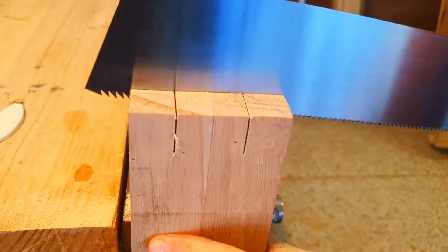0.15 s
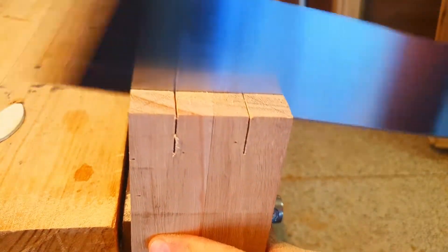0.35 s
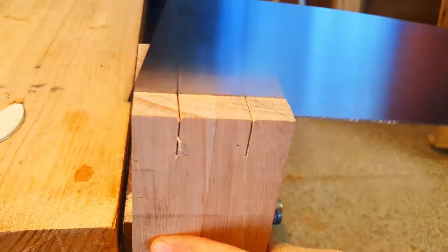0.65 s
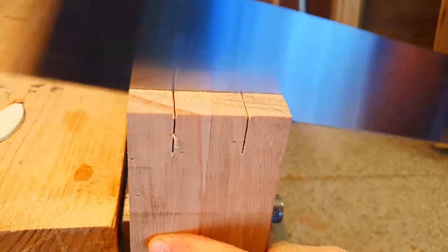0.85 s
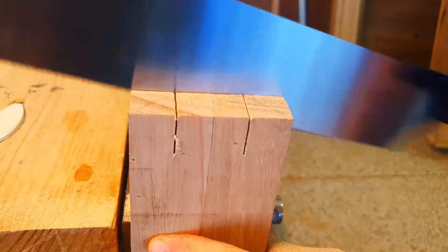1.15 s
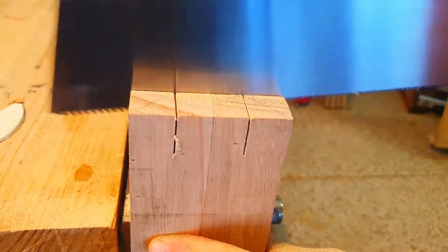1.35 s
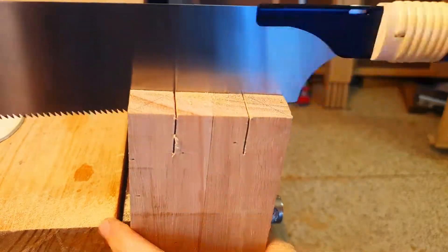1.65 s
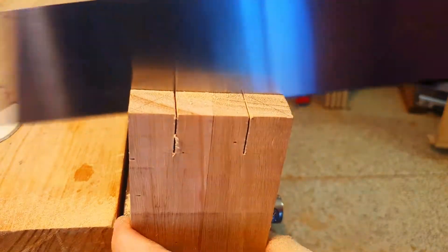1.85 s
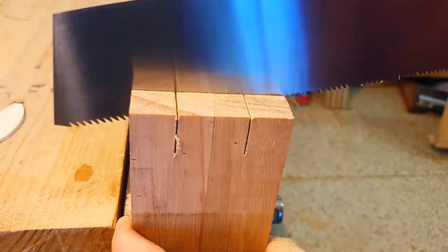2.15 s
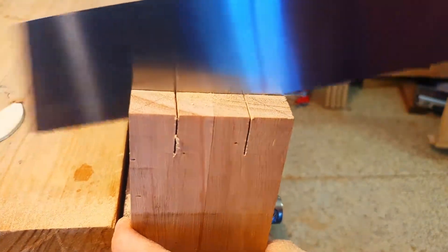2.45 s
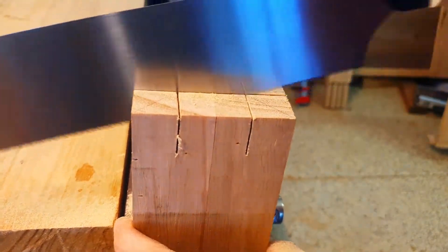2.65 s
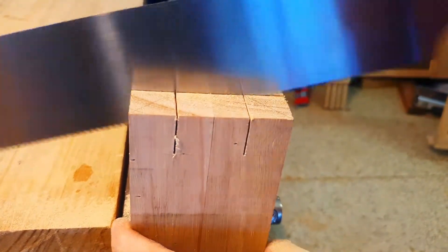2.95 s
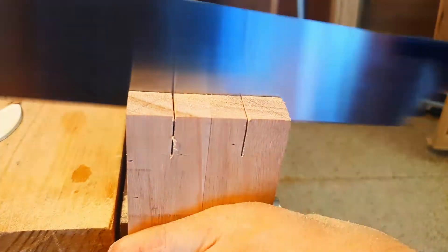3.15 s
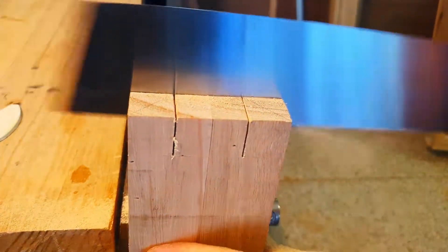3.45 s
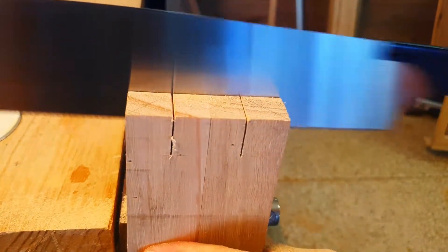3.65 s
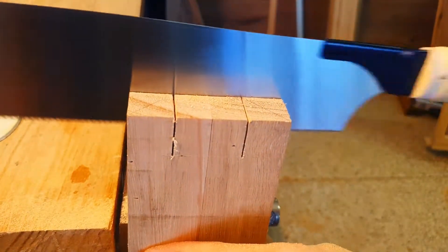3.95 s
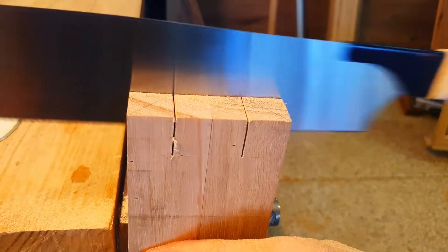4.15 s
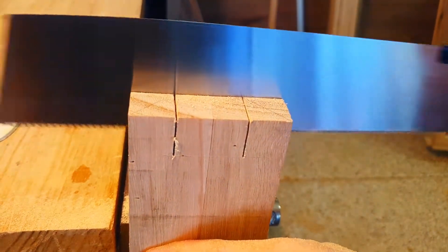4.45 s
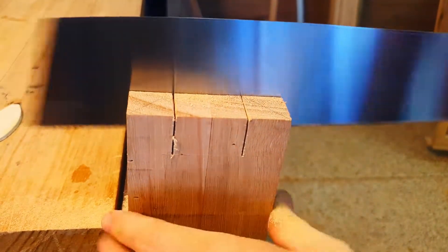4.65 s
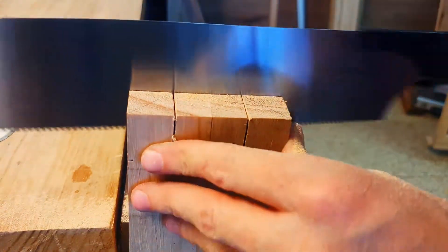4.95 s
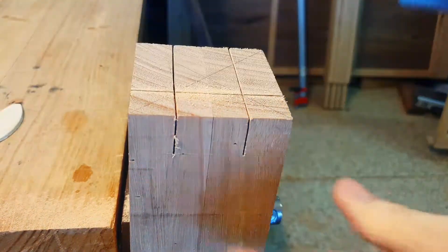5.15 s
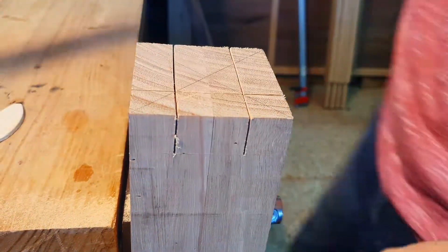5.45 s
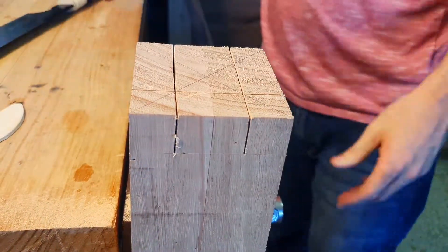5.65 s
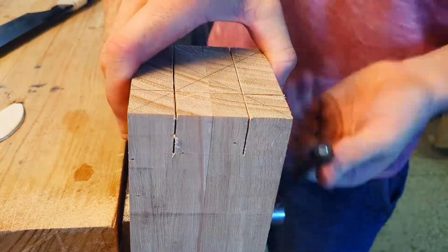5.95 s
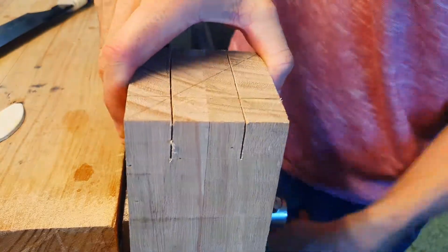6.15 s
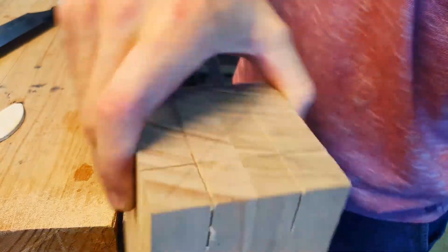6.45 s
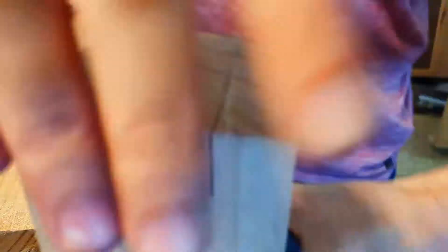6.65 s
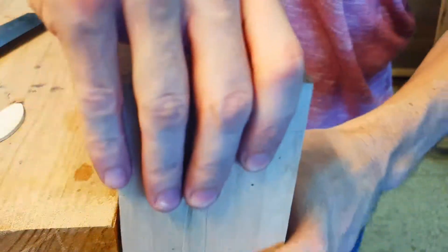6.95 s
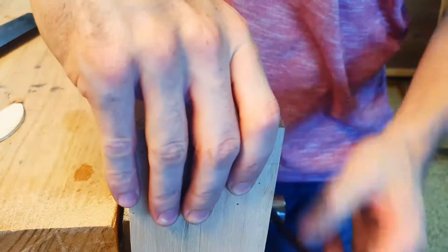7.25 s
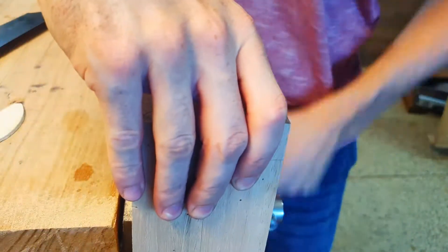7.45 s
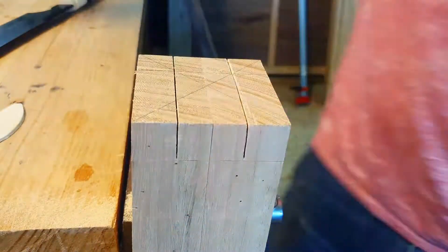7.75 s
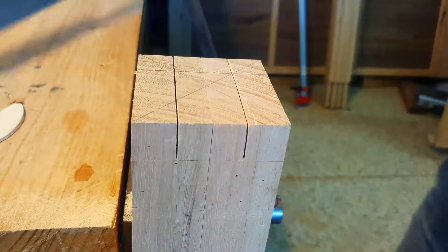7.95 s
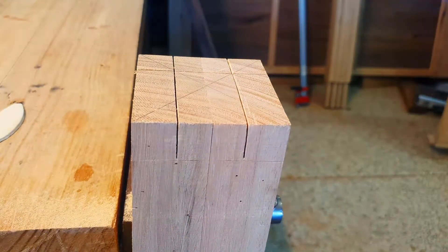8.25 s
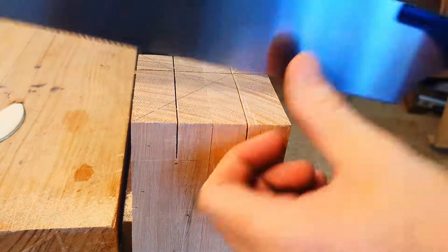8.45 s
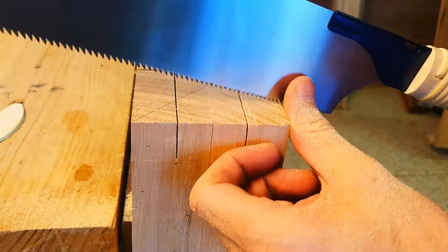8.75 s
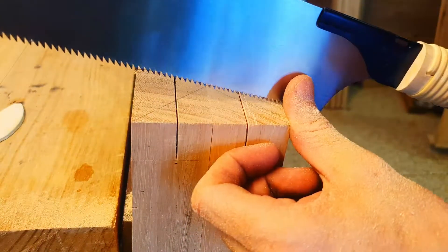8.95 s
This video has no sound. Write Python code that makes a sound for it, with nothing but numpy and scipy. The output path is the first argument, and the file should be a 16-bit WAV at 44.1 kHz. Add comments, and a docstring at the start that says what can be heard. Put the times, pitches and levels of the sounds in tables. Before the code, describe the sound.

Loud, gritty to-and-fro sawing dominates the first five seconds, each stroke ringing the wooden post and thumping the bench. After two short breaks and a very rapid run, the strokes slow and stop. Then come loose timber knocks, skin rubs, bright clamp-pin clicks and spells of low wavering hum. It settles to small scuffs and a light touch of teeth on wood. Heard very close in a workshop with a short dull echo and steady hiss.

```python
"""A thin hand saw rips to and fro through a hardwood post clamped to a bench, close to a two-port microphone.
Shaped noise makes the teeth rasp, and rings the post and bench with every stroke; a few squeaks stand out.
Then hands unclamp, turn and knock the loose post: noise scuffs and rings the wood, the steel clamp pin is tapped
and a low hum of wavering sine waves comes in spells. Last, the saw is set on a new line.
Room noise and a steady hiss run underneath throughout."""
import sys
import numpy as np
from scipy import signal
from scipy.fft import rfft, irfft, next_fast_len
from scipy.io import wavfile
from scipy.ndimage import uniform_filter1d

SR = 44100
rng = np.random.default_rng(int(sys.argv[2]) if len(sys.argv) > 2 else 0)


def write(x):
    x = np.atleast_2d(x).T
    wavfile.write(sys.argv[1], SR, np.round(np.clip(x, -1, 1) * 32767).astype(np.int16))


N = 401310
T = np.arange(N) / SR  # time in seconds

# Resonances of the bench. Each row: pitch in Hz, width in Hz, relative level in dB.
BENCH_MODES = [(63, 35, -4), (89, 34, 9), (154.5, 30, 5.5), (211.2, 56, 1.5)]
# Tone of a scuff or tick. Each row: frequency in Hz, relative level in dB per Hz.
SCUFF_TONE = [(590, -39), (1000, -3), (1660, 2), (2060, 5), (3460, 4.5), (3930, 2.5), (6150, 2.5),
              (7390, -13.5), (11700, 0.5), (15600, -33)]


def undb(db):
    """Turn decibels into a plain gain."""
    return 10 ** (np.asarray(db) / 20)


def unit(x):
    """Scale a sound to an average (rms) level of 1."""
    return x / np.sqrt(np.mean(np.abs(x) ** 2))


def colour(x, points):
    """Filter by (Hz, dB) points joined on a log-frequency axis."""
    size = next_fast_len(N)
    hz, db = np.transpose(points)
    bin_hz = np.arange(size // 2 + 1) * SR / size
    gain = undb(np.interp(np.log(bin_hz + 1), np.log(hz), db))
    return irfft(rfft(x, size) * gain, size)[..., :N]


def ring(x, hz, width):
    """One resonance as a turning, fading pointer; a wider one fades faster. Noise keeps about its level."""
    fade = np.exp(-np.pi * width / SR)
    turn = np.exp(2j * np.pi * hz / SR)
    return signal.lfilter([np.sqrt(1 - fade ** 2)], [1, -fade * turn], x)


def walk(rate):
    """A smooth random wander: rate new levels a second, smoothed twice, with a spread of 1."""
    k = int(SR / rate)
    steps = np.repeat(rng.standard_normal(N // k + 1), k)[:N]
    return unit(uniform_filter1d(uniform_filter1d(steps, k), k))


def adrift(share, rate):
    """A turning pointer that pulls a resonance off its pitch by a wandering share; raise it to the pitch in Hz."""
    return 2j * np.pi * np.cumsum(share * walk(rate)) / SR


def swells(table, steep):
    """Lopsided bells, 6 dB down after the rise or fall time, summed as power; one gain row per dB column."""
    power = np.zeros((len(table[0]) - 3, N))
    for s, rise_ms, fall_ms, *dbs in table:
        near = slice(max(int((s - .3) * SR), 0), int((s + .3) * SR))
        late_ms = 1000 * (T[near] - s)
        drop_db = 6 * abs(late_ms / np.where(late_ms < 0, rise_ms, fall_ms)) ** steep
        power[:, near] += undb(np.array(dbs)[:, None] - drop_db) ** 2
    return np.sqrt(power)


def arches(starts, lengths_ms, peaks, dbs, bend):
    """Level follows speed: an arch from turn to turn with a short tail; one gain row per dB column."""
    overlap_ms, tail_ms = 3.2, 4.4  # each arch reaches past its turns, and starts early to allow for the tail
    power = np.zeros((len(dbs), N))
    for s, ms, peak, db in zip(starts, lengths_ms, peaks, np.transpose(dbs)):
        share = (1000 * (T - s) + overlap_ms + tail_ms) / (ms + 2 * overlap_ms)
        near = (share > 0) & (share < 1)
        speed = np.sin(np.pi * share[near] ** (np.log(.5) / np.log(peak)))
        power[:, near] += (undb(db)[:, None] * abs(speed) ** bend) ** 2
    keep = np.exp(-1000 / (tail_ms * SR))
    return np.sqrt(abs(signal.lfilter([1 - keep], [1, -keep], power)))


def grains(rate, spread_db, smear_ms):
    """Noise for each port in short bursts: fibres that tear at random moments, a few harder than most."""
    hits = (rng.random(N) < rate / SR) * undb(spread_db * rng.exponential(size=N))
    k = max(int(smear_ms * SR / 1000), 1)
    power = uniform_filter1d(uniform_filter1d(hits ** 2, k), k)
    return unit(np.sqrt(abs(power)) * rng.standard_normal((2, N)))


def patches(x, low_hz, count, patchy_db, rate):
    """Bands half an octave apart swell and sink, each in its own time."""
    size = next_fast_len(N)
    both = rfft(x, size)
    bin_hz = np.arange(size // 2 + 1) * SR / size
    steps = 2 * np.log2(bin_hz / low_hz + 1e-9)  # half octaves above low_hz
    total = 0
    for k in range(count):
        band = irfft(both * np.clip(1 - abs(steps - k), 0, 1), size)[:, :N]
        total = total + undb(patchy_db * walk(rate)) * band
    return unit(total)


def body(push, modes, alike):
    """A wooden body rung by a rough push; the ports share part of it, at a phase that wanders as things shift."""
    out, alike = 0, np.clip(alike, 0, 1)
    for hz, width, db in modes:
        # grip and depth of cut keep changing which modes speak, and at what pitch
        waver = undb(db + 2.0 * walk(16)) * np.exp(hz * adrift(0.018, 14))
        left, other = waver * ring(push, hz, max(width, 30))  # no mode is narrower than 30 Hz
        right = alike * left * np.exp(3j * walk(5)) + np.sqrt(1 - alike ** 2) * other
        out = out + np.array([left.real, right.real])
    # little sound leaves the body beyond its lowest and highest mode
    edges = signal.butter(2, [modes[0][0] / 1.5, modes[-1][0] * 1.4], "band", fs=SR, output="sos")
    return signal.sosfilt(edges, out) * np.sqrt(2 / sum(undb(db) ** 2 for _, _, db in modes))


def microphone_hiss():
    """The steady hiss of the microphone: shaped noise at one level."""
    # Tone of the hiss. Each row: frequency in Hz, relative level in dB per Hz.
    hiss_tone = [(18, -17), (30, 5), (169, -1), (390, -8), (1370, -23.5), (1600, -48), (4450, -43.5),
                 (6250, -11.5), (7500, -21), (10500, -7.5), (15600, -48.5)]
    return unit(colour(rng.standard_normal((2, N)), hiss_tone)) * undb(-54)


def room_noise():
    """Flickering shaped noise, rising during the sawing, loudest near 4.5 s, then sinking away."""
    # Mean level of the room. Each row: time in seconds, level in dB before the flicker.
    room_levels = [(0, -59.5), (2.45, -59), (2.9, -45.5), (4.5, -38.5), (5.2, -44), (5.84, -43),
                   (6.55, -42.5), (6.86, -43.5), (6.92, -46), (7.15, -55.5), (7.3, -63), (9.1, -66.5)]
    # Tone of the room. Each row: frequency in Hz, relative level in dB per Hz.
    room_tone = [(18, -54), (30, -2), (197, 0.5), (325, -7.5), (390, -2.5), (731, -7.5), (811, -4.5),
                 (6080, -9.5), (7910, -23), (11100, -12.5), (15600, -45)]
    noise = unit(colour(rng.standard_normal((2, N)), room_tone))
    level_db = np.interp(T, *np.transpose(room_levels))
    return noise * undb(level_db + 1.7 * walk(22))


def low_hum():
    """A low hum in spells: a sine wave and its multiples, with pitch and level that waver."""
    # Spells of hum. Each row: start in seconds, length in ms, middle pitch in Hz,
    # level in dB before the wavering and the multiples' own levels.
    spell_rows = [(5.2, 120, 208.5, -48), (5.58, 180, 213, -47.5), (5.885, 220, 208, -40.5),
                  (6.14, 230, 214, -37), (6.42, 230, 219.7, -39.5), (6.72, 160, 214, -39)]
    # Multiples of the pitch. Each row: multiple, relative level in dB.
    multiples = [(1, 5), (2, -26), (3, -14.5)]
    s, ms, hum_hz, hum_db = np.transpose(spell_rows)
    spells = arches(s, ms, np.full(len(s), .5), [hum_db], 0.15)  # flat-topped arches
    latest = np.maximum(np.searchsorted(s, T) - 1, 0)
    pitch_hz = hum_hz[latest] * (1 + 0.00196 * walk(3.9))
    turn = 2 * np.pi * np.cumsum(pitch_hz) / SR
    lag = np.array([[0], [2.5]])  # radians between the ports
    hum = sum(undb(db) * np.sin(k * turn + lag) for k, db in multiples) * np.sqrt(2)
    return hum * spells * undb(1.7 * walk(39))


def pin():
    """Taps on the steel clamp pin: a bright tick a few ms long, and short high modes when it is free to ring."""
    # Taps. Each row: time in seconds, push in dB for the tick, push in dB for the ring (both before filtering).
    tap_rows = [(5.585, -51, -63), (5.836, -24, -70), (5.972, -27.5, -49), (6.562, -41, -25.5),
                (7.073, -38, -48)]
    # Ringing modes of the pin. Each row: pitch in Hz, relative level in dB, seconds to fade by 60 dB.
    pin_modes = [(6800, -6.5, 0.057), (10150, -11, 0.096), (11140, 0, 0.072)]
    push = np.zeros((2, 2, N))  # tick and ring, each for two ports
    shape = signal.windows.exponential(400, 40, 90.0, False)  # lengths in samples
    tick = rng.standard_normal((len(tap_rows), 2, 400)) * shape
    for (s, *dbs), burst in zip(tap_rows, tick):
        start = int(s * SR)
        push[..., start:start + burst.shape[1]] += undb(dbs)[:, None, None] * burst
    rings = 0
    for hz, db, t60 in pin_modes:
        width_hz = np.log(1000) / np.pi / t60
        rings = rings + undb(db) * ring(push[1], hz, width_hz).real
    return undb(13.5) * rings + colour(push[0], SCUFF_TONE)


def squeaks():
    """Short squeaks and one wide, bright rustle: noise riding on a gliding pitch under a bell-shaped level."""
    # Squeaks and the rustle. Each row: middle in seconds, length in ms between the points 6 dB down,
    # start pitch in Hz, end pitch in Hz, noise width in Hz, gain of the noise at the middle in dB.
    squeak_rows = [(1.025, 29, 4030, 4140, 60, -28), (1.106, 38, 4120, 4110, 60, -15),
                   (1.223, 29, 4060, 4100, 60, -19), (1.349, 48, 4110, 4070, 80, -22),
                   (5.351, 24, 3650, 3510, 200, -38), (6.645, 35, 3900, 3500, 100, -38.5),
                   (6.685, 24, 3110, 3010, 100, -38.5), (6.811, 60, 2304, 3040, 351, -39),
                   (7.79, 37, 4950, 4850, 250, -51.5), (8.3, 39, 2200, 2300, 250, -63),
                   (8.41, 60, 2500, 2910, 250, -60), (8.62, 80, 2300, 2250, 199.4, -64),
                   (8.925, 40, 2850, 2800, 198, -68.5), (8.43, 120, 12360, 12240, 1990, -52)]
    out = np.zeros((2, N))
    noise = rng.standard_normal((len(squeak_rows), 2, 8000))
    for (s, ms, start_hz, end_hz, width_hz, db), rough in zip(squeak_rows, noise):
        near = int(s * SR) + np.arange(-4000, 4000)
        x = (T[near] - s) * 1000 / ms  # -0.5 at the start of the glide, 0.5 at its end
        pitch_hz = np.interp(x, [-.5, .5], [start_hz, end_hz])
        turn = 2 * np.pi * np.cumsum(pitch_hz) / SR
        squeak = ring(rough, 0, width_hz).real * np.sin(turn) * np.sqrt(2)
        out[:, near] += undb(db - 24 * x ** 2) * squeak
    return out


def hands():
    """Skin scuffs; knocks on an edge ring the loose post's upper modes, on a face the lower; drops thump the bench."""
    # Resonances of the post out of the clamp. Each row: pitch in Hz, width in Hz, relative level in dB.
    loose_modes = [(213, 28, 5), (311.6, 57, 0), (401, 64, 0), (553.5, 93, 1.5), (694.2, 90, 0.5),
                   (863, 67, 0), (1030, 140, 1.5), (1238, 140, 0.5), (1430, 130, -5), (1745, 240, -5)]
    # Knocks of timber and clamp. Each row: peak time in seconds, then levels in dB before the mix below:
    # scuff, edge, face, bench.
    knock_rows = [(5.332, -35, -26.5, -35, -49), (5.364, -35, -27.5, -47, -46), (5.651, -42, -37, -33, -38),
                  (5.681, -43, -37, -28.5, -38), (5.836, -34.5, -41, -36.5, -44),
                  (5.925, -37, -27.5, -33, -55), (5.958, -43, -40, -43, -45),
                  (6.151, -44.5, -31, -31, -33.5), (6.41, -66, -52, -39, -32),
                  (6.455, -58, -44.5, -42, -31), (6.567, -35.5, -32, -19.5, -32),
                  (6.883, -41, -46, -28.5, -27), (6.941, -58, -42, -43, -26), (7.117, -37, -32, -17.5, -25),
                  (7.135, -44, -37, -35, -19.5), (7.269, -52, -43, -47, -36), (7.605, -58.5, -49, -51, -51),
                  (7.742, -56, -58, -58.5, -44.5), (7.925, -34, -44.5, -58, -50),
                  (8.041, -51.5, -53, -58, -50), (8.2, -56, -71, -61, -52), (8.7, -65, -68, -66, -45.5),
                  (8.84, -72, -76, -58, -47.5), (8.88, -72, -69, -61, -58), (8.914, -66.5, -65, -66, -48)]
    # Hands and blade slide over timber. Each row: start in seconds, length in ms, then levels in dB
    # before the mix below: scuff, wood.
    rub_rows = [(1.624, 67, -40.5, -41.5), (2.41, 22, -56, -51.5), (5.18, 75, -50, -48.5),
                (5.32, 85, -38, -39), (5.57, 42, -35, -45.5), (6.2, 170, -61, -48), (6.6, 126, -42, -56),
                (6.74, 91, -39, -46.5), (7.02, 63, -51, -43.5), (7.199, 120, -75, -50),
                (7.38, 130, -70, -65), (7.49, 48, -62, -63), (7.74, 140, -52, -57.5),
                (7.83, 150, -44, -47.5), (8.05, 90, -50.5, -55), (8.14, 74, -70, -60),
                (8.26, 100, -52, -63), (8.359, 120, -53, -57.5), (8.53, 165, -53.5, -52.5), ]
    # How a rub's wood level is shared out: dB added for edge, face, bench.
    wood_share_db = (-6, 0.5, 3)
    rise_ms, fall_ms = 7, 15.7
    blow_db, blow_ms = 2.5, 1.07  # the first hard contact of a knock

    knocks = swells([(s, rise_ms, fall_ms, *dbs) for s, *dbs in knock_rows], 1.26)
    s, ms, scuff_db, wood_db = np.transpose(rub_rows)
    rub_dbs = [scuff_db, *(wood_db + db for db in wood_share_db)]
    rubs = arches(s, ms, np.full(len(s), .5), rub_dbs, 0.61)
    scuff, edge, face, bench = np.hypot(knocks, rubs)

    upper = [mode for mode in loose_modes if mode[0] > 480]
    lower = [mode for mode in loose_modes if mode[0] < 800]
    push, skin = grains(1200, 1.2, 4.0), grains(1500, 1.2, 4.0)
    blows = np.bincount([int(row[0] * SR) for row in knock_rows], minlength=N)
    push = push + undb(blow_db) * np.convolve(blows, np.hanning(int(blow_ms * SR / 1000)), "same")
    scuffs = scuff * patches(colour(skin, SCUFF_TONE), 705, count=10, patchy_db=4.0, rate=14)
    return (scuffs + undb(0.5) * body(edge * push, upper, 1.0)
            + undb(-1.0) * body(face * push, lower, 0.92)
            + undb(-4.0) * body(bench * push, BENCH_MODES, 1.0))


def teeth(band_db=-10, width_hz=45):
    """Rasp of the teeth: torn noise mixed with 30 narrow noise bands whose levels wander and whose pitches
    drift together; half-octave bands swell and sink."""
    # Tone of the rasp. Each row: frequency in Hz, relative level in dB per Hz.
    rasp_tone = [(650, -37.5), (1100, -6), (1310, -0.5), (1730, -7), (2000, -1.5), (3230, -1.5),
                 (3990, 2.5), (4980, -1.5), (6210, 2.5), (6570, -1), (7260, -14), (7760, -13.5), (10900, 1),
                 (15600, -17)]
    tear = grains(4000, 1.2, 1.8)
    bands_hz = 1500 * 8 ** ((np.arange(30) + rng.random(30)) / 30)  # spread over three octaves
    drift = adrift(0.02, 3)
    bands = 0
    for hz in bands_hz:
        band = (ring(tear, hz, width_hz) * np.exp(hz * drift)).real
        bands = bands + undb(5.5 * walk(20)) * band * np.sqrt(hz)
    rasp = colour(tear + undb(band_db) * unit(bands), rasp_tone)
    return patches(rasp, 600, count=11, patchy_db=1.8, rate=22)


def sawing():
    """Each stroke rasps, booms in the clamped post and thumps the bench; short extra bursts swell all three."""
    # Strokes, pull and push in turn, a pull first. Each row: start in seconds, length in ms,
    # then levels in dB before the mix below: rasp, post, bench.
    stroke_rows = [(-0.03, 84, -13, -16.5, -26.5), (0.055, 46, -18.0, -20.5, -36.5),
                   (0.102, 54.4, -19.5, -31.5, -32.5), (0.254, 55, -22, -23, -40.5),
                   (0.293, 62.5, -14.5, -19.5, -23), (0.361, 38, -19, -17.5, -36),
                   (0.391, 77, -12.5, -19.5, -24), (0.468, 57, -18.5, -14, -30.5),
                   (0.52, 52.5, -11.5, -20.5, -26.5), (0.581, 50, -18, -17, -36),
                   (0.631, 53.5, -12.5, -20.5, -28.5), (0.69, 48, -17.0, -19, -30),
                   (0.74, 56, -12, -20, -20), (0.8, 61, -19, -25.5, -35), (0.848, 58, -13, -25, -23.5),
                   (0.912, 61, -19.5, -28, -43.5), (0.972, 69.5, -15, -22, -26.5),
                   (1.039, 45, -19, -20, -31), (1.078, 60.4, -13.5, -32, -20.5), (1.145, 49, -22, -26, -36),
                   (1.189, 54.5, -18, -25.5, -25), (1.25, 75, -24.5, -31, -35),
                   (1.318, 61.4, -15, -21.5, -35), (1.385, 42, -20.5, -18.5, -25.5),
                   (1.429, 55.4, -14.5, -16.5, -26), (1.489, 55, -24.5, -25, -34),
                   (1.678, 66, -17, -17.5, -21), (1.751, 62, -22, -21.5, -31), (1.803, 46, -17, -19.5, -23),
                   (1.861, 51, -21.5, -19, -27.5), (1.907, 51.6, -15.5, -15, -21),
                   (1.973, 37, -22.5, -18, -34.5), (2.012, 61.5, -17, -20, -23),
                   (2.076, 43, -20, -19.5, -30.5), (2.117, 62.4, -15, -17.5, -20),
                   (2.184, 40, -22.5, -18, -25.5), (2.223, 68, -20, -17.5, -14.5),
                   (2.292, 63, -25.5, -24.5, -29), (2.425, 80, -20.5, -20, -24),
                   (2.546, 104, -30.5, -27, -29.5), (2.66, 115, -19.5, -16, -18.5),
                   (2.789, 106, -28, -29.5, -39), (2.907, 119, -21.5, -18.5, -22.5),
                   (3.052, 64, -24.5, -34, -36), (3.107, 51.5, -17, -19.5, -24),
                   (3.157, 37, -19.5, -22.5, -35.5), (3.193, 52, -15.5, -20, -20.5),
                   (3.245, 35, -18.5, -24.5, -44), (3.279, 53, -14.5, -17, -27.5),
                   (3.33, 40, -18.5, -18, -37.5), (3.364, 47, -14, -14.5, -27),
                   (3.413, 41, -18, -19.5, -40), (3.45, 48, -14.5, -14, -18.5),
                   (3.498, 37, -17, -19.5, -33), (3.533, 41.6, -13.5, -17, -20),
                   (3.58, 32, -16, -21, -32.5), (3.609, 40, -15, -18.5, -36),
                   (3.656, 22.5, -15.5, -15.5, -41.5), (3.685, 40.6, -12, -13, -28),
                   (3.735, 31, -20, -20, -29), (3.765, 41, -15.5, -20, -31.5), (3.81, 23, -19, -21, -39.5),
                   (3.835, 54, -16, -20.5, -25.5), (3.893, 66, -23.5, -22.5, -33),
                   (3.964, 114, -21.5, -21.5, -35.5), (4.071, 77, -21.5, -20.5, -33.5),
                   (4.15, 99, -16, -19, -33), (4.247, 90, -20.5, -24, -43.5), (4.333, 170, -27, -28, -27.0),
                   (4.439, 119, -22, -26, -30.5), (4.623, 186, -29.0, -29, -34.5),
                   (4.922, 130, -25.5, -24.5, -19.5), (5.008, 85, -26, -23, -22.5),
                   (5.058, 79, -18, -21.5, -23.5), (9.028, 71, -40, -32, -31)]
    # Short extra bursts of sawing: rasp, post and bench swell briefly at these times.
    # Each row: peak time in seconds, then levels in dB before the mix below: rasp, post, bench.
    burst_rows = [(1.106, -17.5, -14, -25.5), (1.704, -28, -29, -12.5), (2.255, -16.5, -23, -26),
                  (2.72, -24.5, -13.5, -16.5), (2.928, -24, -6.5, -12), (2.975, -26, -14.5, -14.5),
                  (4.039, -19, -25.5, -23.5), (4.361, -21.5, -21.5, -23.5), (4.52, -23, -30, -27),
                  (4.76, -47, -30.5, -23), (4.954, -24, -19, -40), (5.09, -34, -19.5, -29.5),
                  (9.066, -32.5, -39.5, -35.5)]
    # Resonances of the clamped post. Each row: pitch in Hz, width in Hz, relative level in dB.
    post_modes = [(256.4, 180, -6), (356.2, 54, 2), (449.6, 35, 7), (560.4, 41, -8.5), (683.3, 39, 1.5),
                  (819, 23, -8.5), (929, 45, -2.5), (1088, 100, -13)]
    rise_ms, fall_ms = 12, 14.5
    s, ms, *dbs = np.transpose(stroke_rows)
    bursts = swells([(at, rise_ms, fall_ms, *db) for at, *db in burst_rows], 2.2)
    # blade speed rises and falls between two turns of the hand, highest just before the middle
    strokes = arches(s, ms, np.full(len(s), 0.48), dbs, 1.22)
    rasp, post, bench = np.hypot(strokes, bursts)
    bite, shove = grains(900, 1.0, 4.0), grains(600, 1.2, 2.0)
    return (undb(0.58) * rasp * teeth()
            + undb(-0.22) * body(post * bite, post_modes, 0.83)
            + undb(-2.2) * body(bench * shove, BENCH_MODES, 0.5))


def walls(x):
    """The workshop answers the saw: a short, dull tail of echoes made of fading noise, different at each port."""
    level_db, t60_s, dull_hz = -20.5, 0.11, 500
    t = T[:SR // 2]
    tail = rng.standard_normal((2, len(t))) * undb(-60 * t / t60_s)
    tail = signal.lfilter(*signal.butter(1, dull_hz, fs=SR), tail)
    tail = tail / np.sqrt(np.sum(tail ** 2) / 2)
    return undb(level_db) * signal.fftconvolve(x, tail, axes=1)[:, :N]


def scene():
    """Add all the sources together; only the saw gets echoes."""
    background = microphone_hiss() + room_noise() + low_hum()
    saw = sawing()
    return background + pin() + squeaks() + hands() + saw + walls(saw)


def record(dry):
    """The two ports favour different bands; peaks clip at full scale; the top is cut."""
    # Difference between the ports. Each row: frequency in Hz, left minus right in dB.
    port_balance = [(60, -4), (110, 1.5), (200, -2.5), (380, -6), (700, -4.5), (1290, -1.5), (2380, -2.5),
                    (4400, 0), (8120, 4.5), (15000, -10)]
    left = colour(dry[0], [(hz, db / 2) for hz, db in port_balance])
    right = colour(dry[1], [(hz, -db / 2) for hz, db in port_balance])
    top_cut = signal.ellip(10, .2, 70, 15680, fs=SR, output="sos")  # low-pass at 15680 Hz
    return signal.sosfilt(top_cut, np.clip([left, right], -1, 1))


dry = scene()
out = record(dry)
write(out)
```